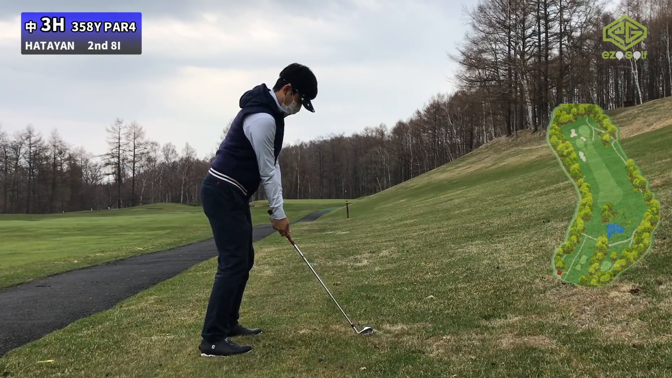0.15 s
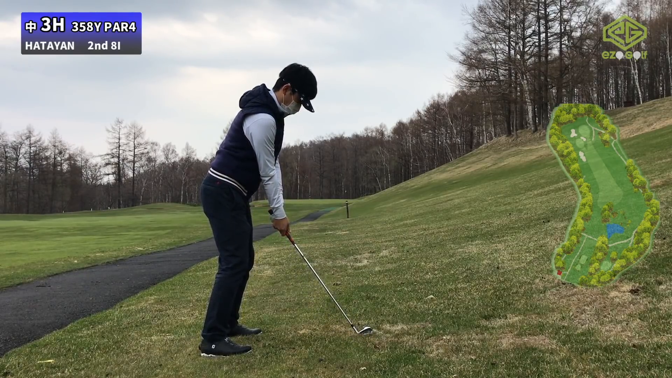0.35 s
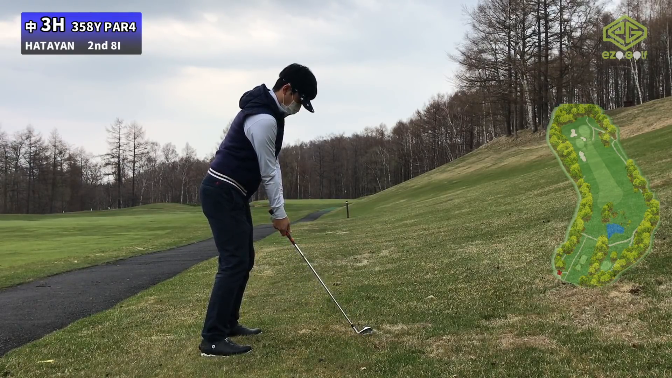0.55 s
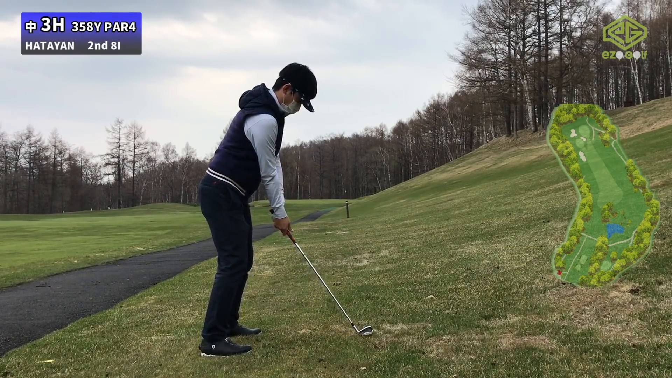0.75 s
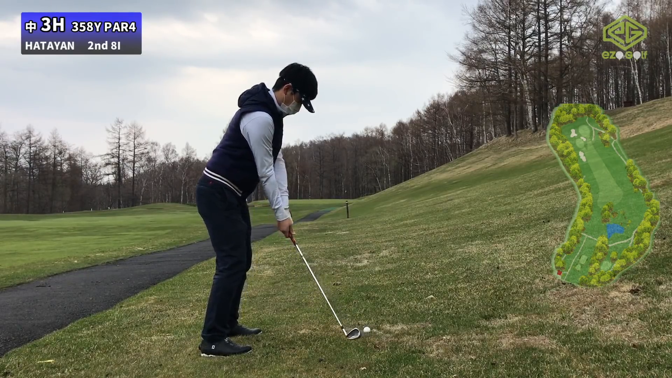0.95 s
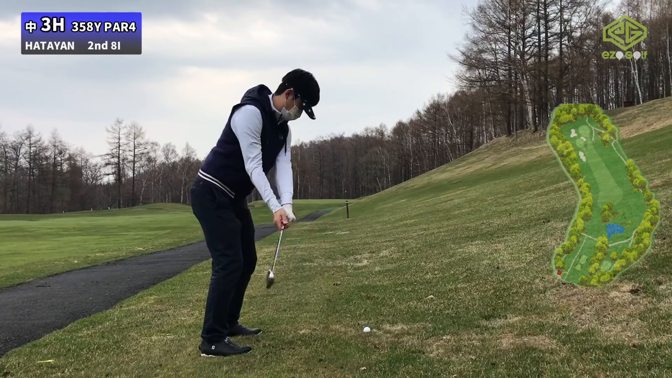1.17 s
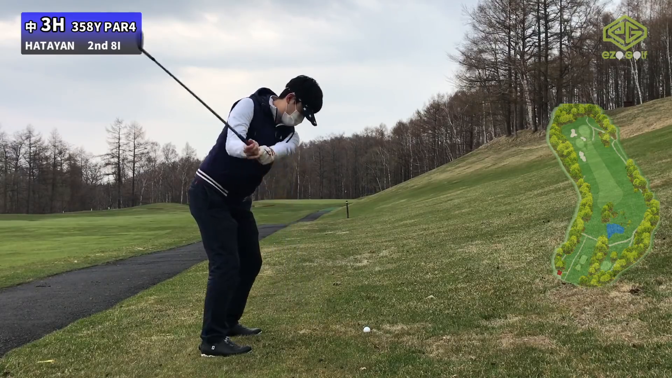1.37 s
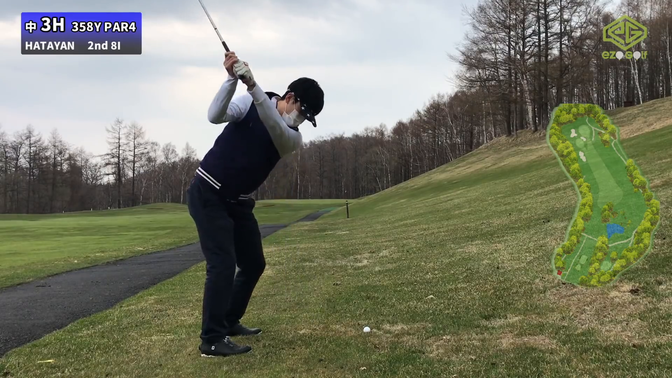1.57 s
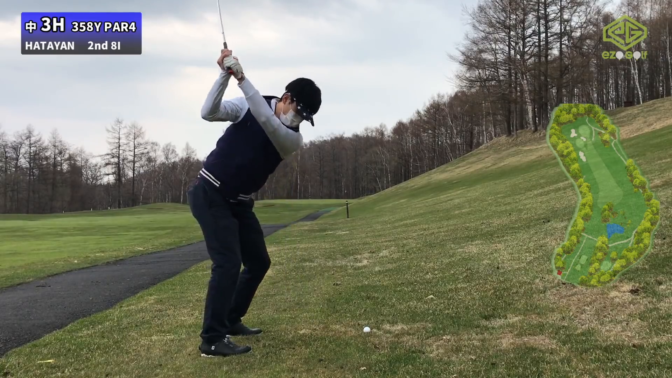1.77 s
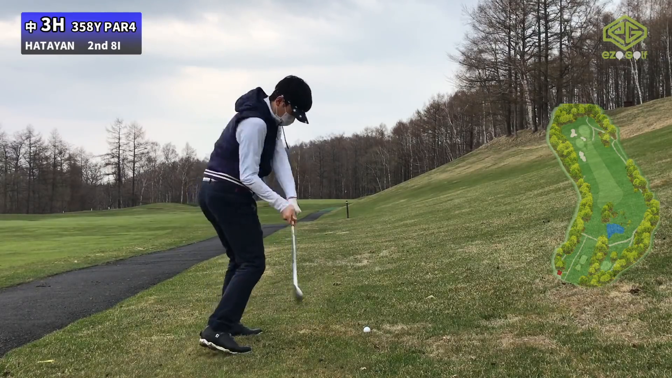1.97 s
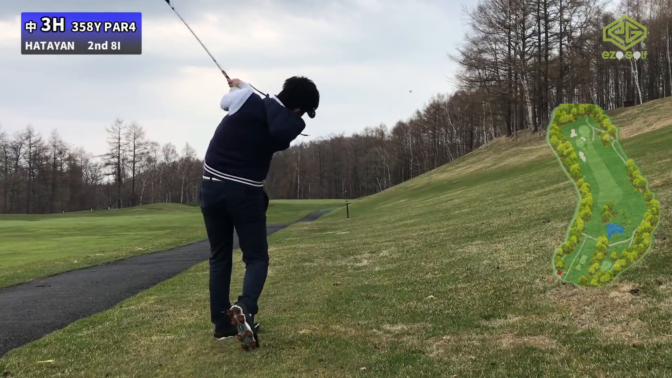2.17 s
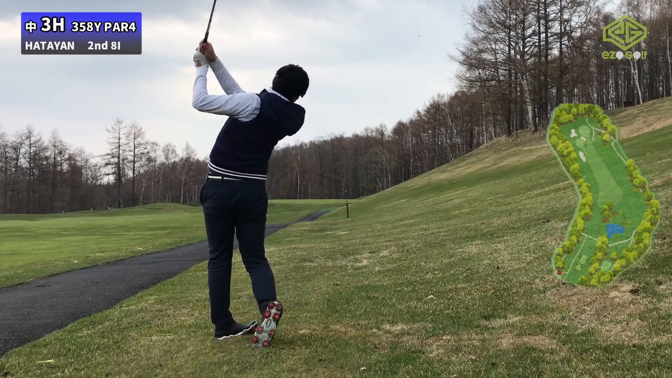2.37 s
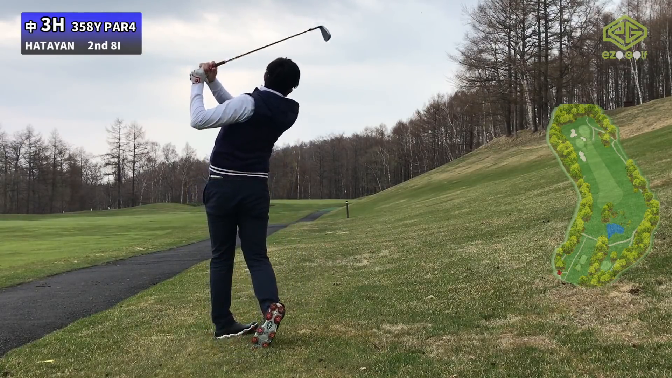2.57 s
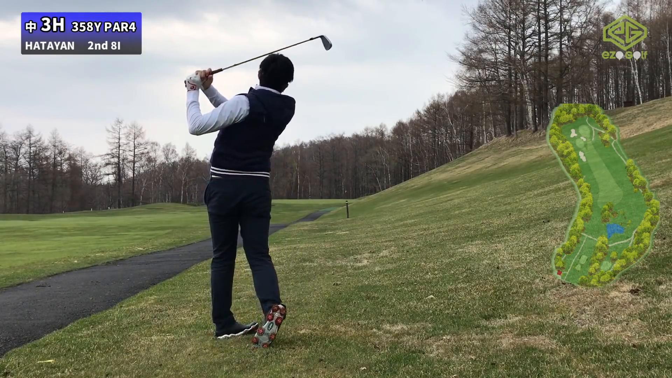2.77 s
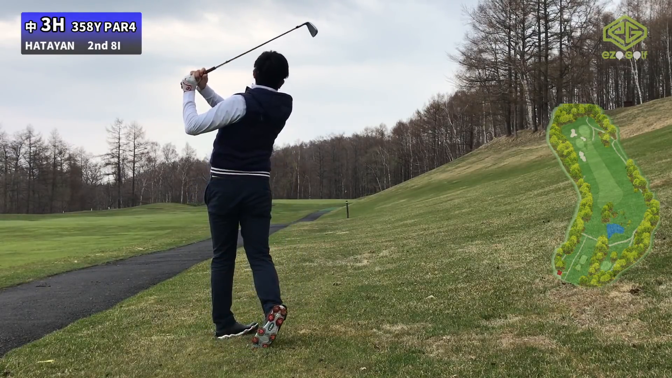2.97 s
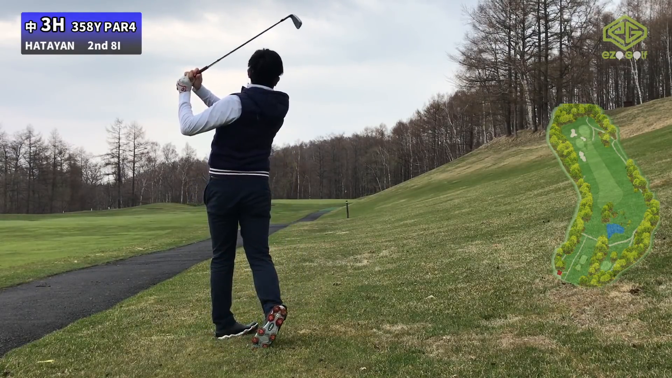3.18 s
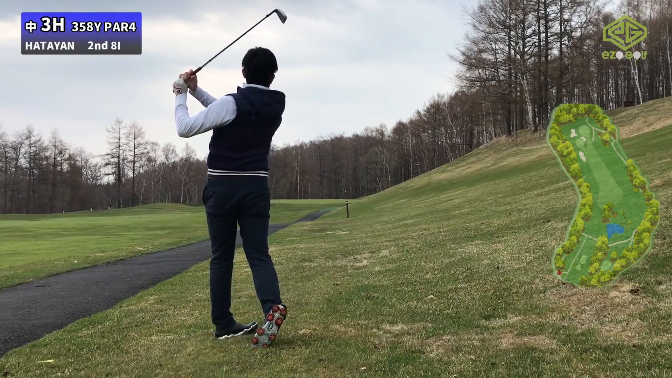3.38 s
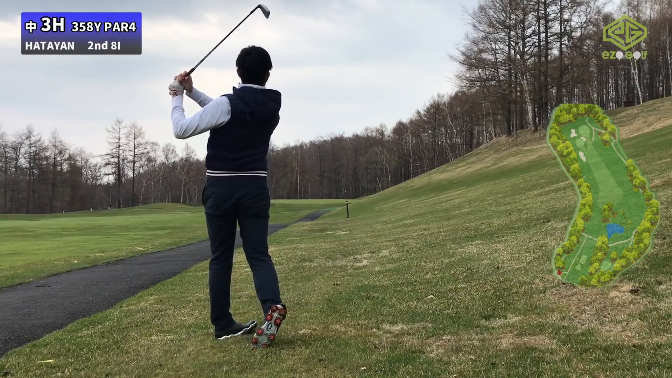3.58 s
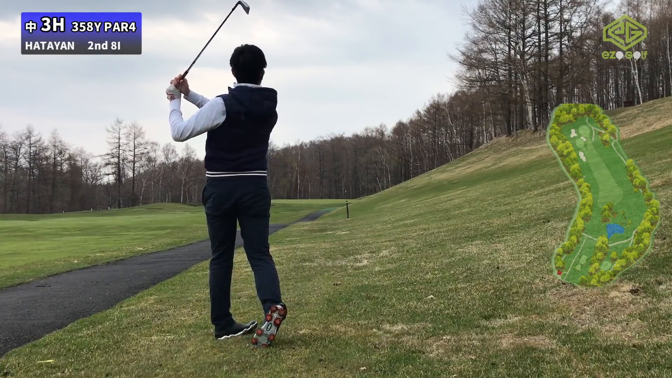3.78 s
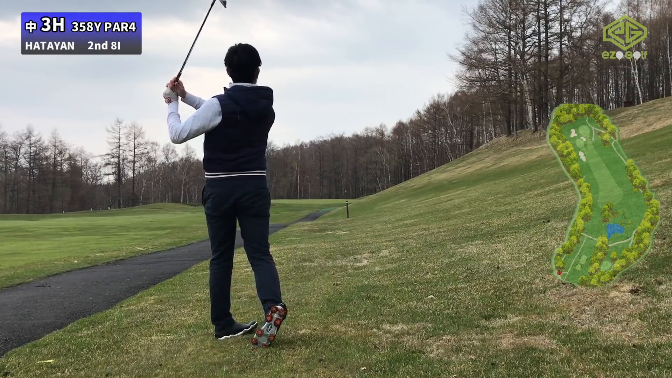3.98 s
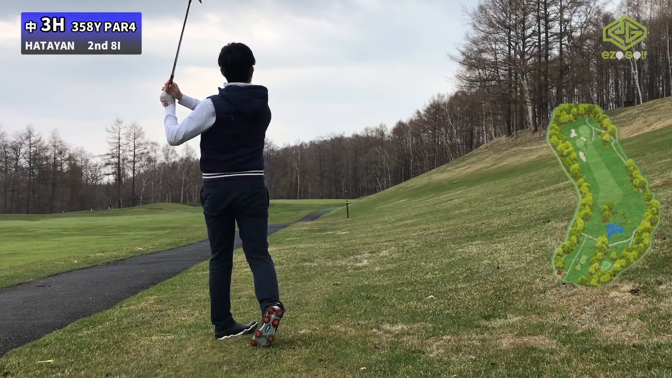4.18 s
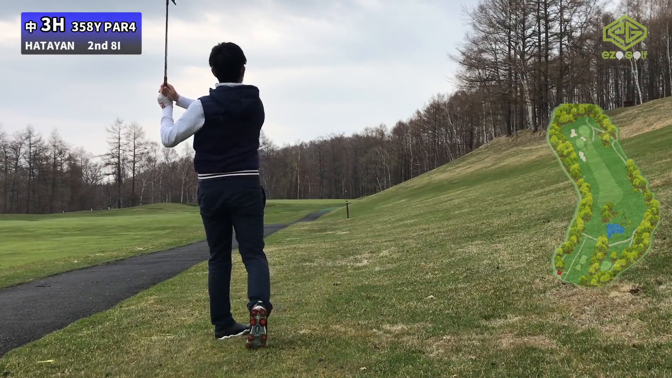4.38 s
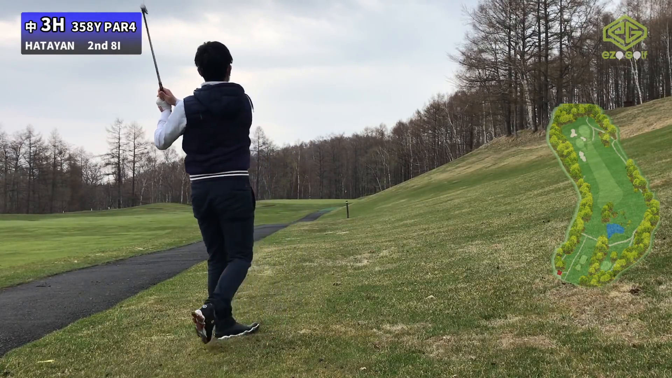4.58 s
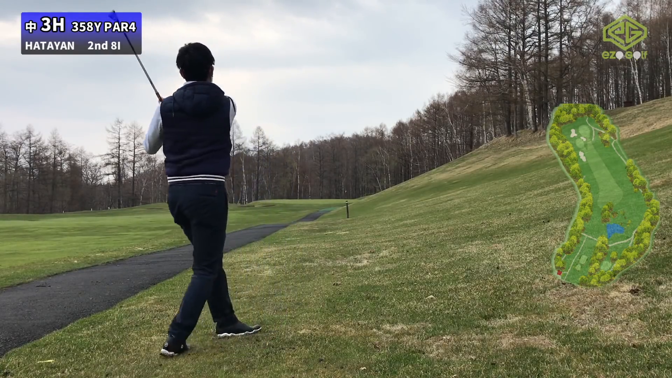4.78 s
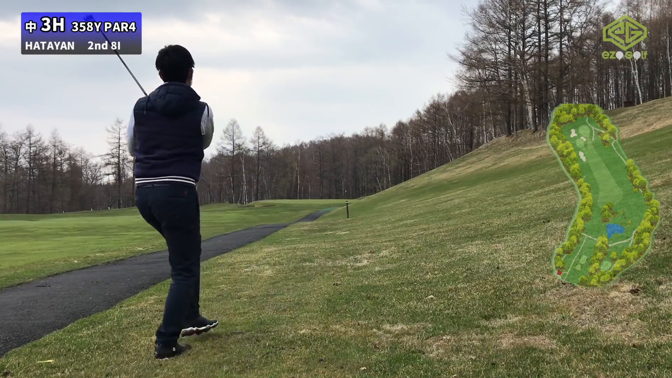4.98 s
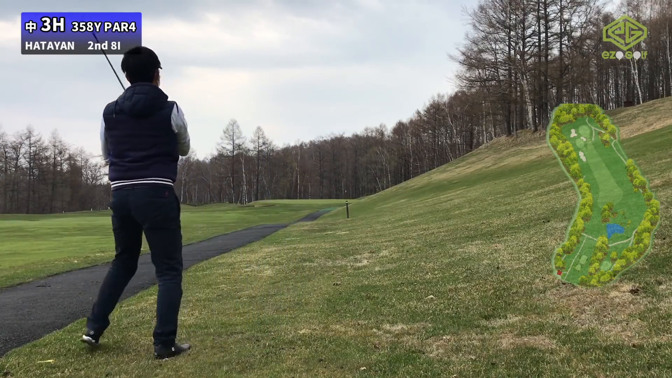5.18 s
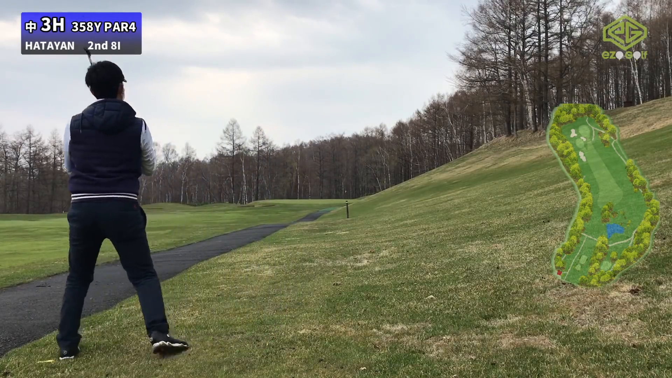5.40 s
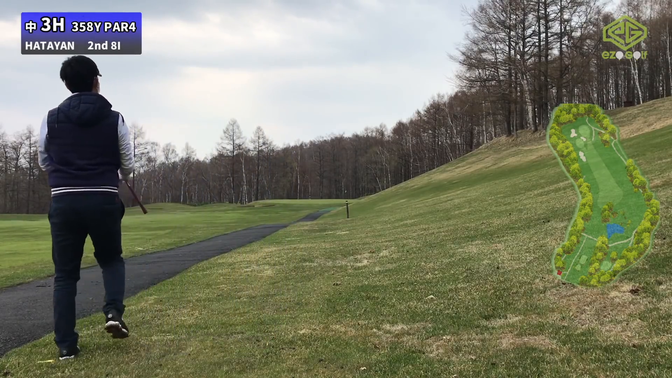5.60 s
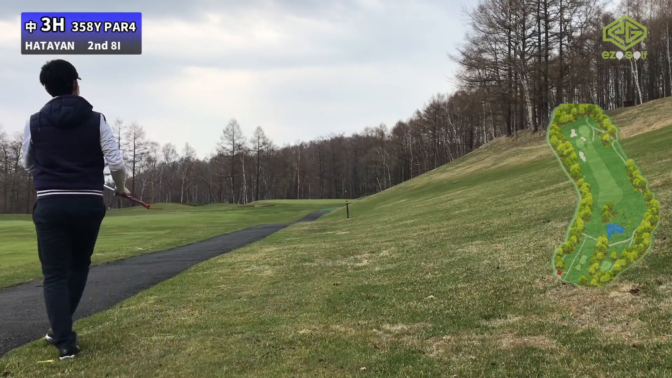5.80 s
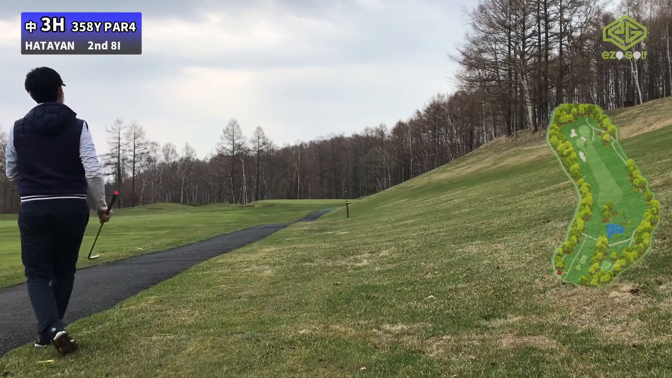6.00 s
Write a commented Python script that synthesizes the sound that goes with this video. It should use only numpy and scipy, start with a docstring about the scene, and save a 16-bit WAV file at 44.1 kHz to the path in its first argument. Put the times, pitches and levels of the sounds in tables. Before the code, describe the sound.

A golf iron swishes and hits the ball with one sharp crack, over the low hum of a distant idling engine.

```python
"""A golfer hits an iron off a fairway. From the start an engine hums and whines some way off, under a
light wash of outdoor air. Clothes creak and shoes brush the grass. About two seconds in, the club
swishes through the air, its steel face cracks on the ball and overloads the microphone, and torn turf
sprays away. Something snaps once in the follow-through. Then the golfer shuffles and the engine idles on."""
import sys
import numpy as np
from scipy import signal
from scipy.fft import rfft, irfft, next_fast_len
from scipy.io import wavfile

SR = 44100
rng = np.random.default_rng(int(sys.argv[2]) if len(sys.argv) > 2 else 0)


def waveform_to_disk(signal):
    """Save audio, clipped to [-1, 1], as 16-bit WAV at the path in sys.argv[1]."""
    frames = np.transpose(np.atleast_2d(signal))
    scaled = np.clip(frames, -1, 1) * 32767
    samples = np.round(scaled).astype(np.int16)
    wavfile.write(sys.argv[1], SR, samples)


N = 266716
STRIKE_S = 2.1524  # the moment the club meets the ball


def strike(ball_lag_s=.00093):
    """The hit makes the steel face ring; the ball knocks and the ground thumps just after."""
    # Ringing tones of the club face: f/Hz, level/dB, time to fade by 60 dB/s
    face_modes = [(2380, 8, .0074), (2800, -6, .015), (2970, -7, .0146), (3370, 10, .0059),
                  (3820, -8, .019), (4050, -7, .0138), (4760, -11, .0115), (5880, 9, .0089),
                  (6580, 17, .0054), (7130, 12, .0062), (8570, -8, .013), (12050, -9, .016),
                  (13800, -3, .009)]
    # Tones of the ball's knock: f/Hz, level/dB, time to fade by 60 dB/s
    ball_modes = [(860, -5, .0146), (1120, 7.5, .012), (1610, 13, .0075), (2020, 12, .0052),
                  (1640, -28, .08)]
    # Low tones of the turf's thump: f/Hz, level/dB, time to fade by 60 dB/s
    ground_modes = [(145, -22.5, .05), (85, -24.5, .07)]
    face = ring(clicks([(STRIKE_S, 0)]), face_modes)
    push = clicks([(STRIKE_S + ball_lag_s, 0)])
    bass_cut = signal.butter(4, 700, "high", fs=SR, output="sos")  # so small a ball gives off no bass
    ball = signal.sosfilt(bass_cut, ring(push, ball_modes))
    return face + ball + ring(push, ground_modes)


def swish(downswing_s=.115, t60_s=.13, top_db=-34, top_eddy_hz=600, hiss_db=-5, eddy_db=-6.5):
    """The club sheds swirls of air (eddies): their tone and hiss grow higher and louder with speed."""
    since_hit = np.arange(N) / SR - STRIKE_S
    # Like a pendulum, the club is fastest at the bottom, where the ball lies.
    speed = np.sin(np.pi / 2 * np.clip(1 + since_hit / downswing_s, 1e-3, 1))
    level_db = top_db + 10 * np.log2(speed)
    dying_db = -60 * np.clip(since_hit / t60_s, 0, 4)
    eddy_hz = top_eddy_hz * speed
    hiss, near = np.zeros(N), np.abs(since_hit) < .25
    for hz in np.geomspace(250, 11000, num=10):
        # The hiss falls off gently above the eddy tone and steeply below it.
        octaves = np.log2(hz / eddy_hz[near])
        slope_db = -2 * np.maximum(octaves, 0) + 12 * np.minimum(octaves, 0)
        hiss[near] += from_db(slope_db) * band_noise(hz, 1.25, rng.standard_normal(near.sum()))
    eddies = tone(eddy_hz * (1 + .12 * drift(90))) * from_db(2 * drift(60))
    return from_db(level_db + dying_db) * (from_db(hiss_db) * speed * hiss + from_db(eddy_db) * eddies)


def divot(lag_s=.004, crunch_db=-10.5, tear_db=-25.5, spray_db=-49.5):
    """The blade digs into the turf: a short crunch, tearing roots, then soil and grass raining down."""
    # Spectrum of tearing turf: f/Hz, relative level/dB
    turf_spectrum = [(300, 1.5), (700, 2.5), (1500, -6), (3000, -1.5), (5000, -5), (7000, -2.5),
                     (10000, -7.5), (13000, -3.5), (15500, -15.5)]
    peak_s = STRIKE_S + lag_s
    crunch = from_db(crunch_db) * envelope(peak_s, attack_s=.021, hold_s=0, t60_s=.0058)
    tear = from_db(tear_db) * envelope(peak_s, attack_s=.03, hold_s=0, t60_s=.0863)
    spray = from_db(spray_db) * envelope(peak_s, attack_s=.03, hold_s=.39, t60_s=.28)
    return (crunch + tear + spray) * colour(grains(per_s=8100, spread_db=2.5), turf_spectrum)


def snap(at_s=2.3753, snap_db=-11, crack_db=-22, lead_s=.0026, count=3):
    """Something gives way in the follow-through: a few small, uneven cracks, then one sharp one."""
    # Ringing tones of the thing that snaps: f/Hz, level/dB, time to fade by 60 dB/s
    snap_modes = [(517, -12.5, 0.022), (1320, -13.5, 0.0061), (2630, -7.5, 0.003), (3900, -4.5, 0.0034),
                  (5900, -1, 0.0012), (8500, 0, 0.00073), (12500, -5, .001)]
    leads = lead_s * (count - np.arange(count) - .5 * rng.random(count)) / count
    small_cracks = [(at_s - lead, crack_db) for lead in leads]
    return ring(clicks(small_cracks + [(at_s, snap_db)]), snap_modes)


def rustle(tick_t60_s=.0047, crumble_db=-15):
    """As the golfer moves, cloth and grass rub softly and give small, dry ticks."""
    # Movements that brush clothes and shoes: t/s, time held/s, level/dB
    brushes = [(1.24, 0.13, -65), (1.434, 0.43, -62.5), (1.83, 0.27, -59.5), (2.494, 0.062, -52),
               (2.674, 0.076, -60.5), (4.832, 0.2, -60.5), (5.36, .17, -61), (5.588, .02, -58),
               (5.95, .1, -65)]
    # Spectrum of the brushing: f/Hz, relative level/dB
    grass_spectrum = [(1500, -11), (3500, 5), (6000, -0.5), (9000, -5), (13000, -4), (15800, -5.5)]
    # Ticks of clothes, grip and dry grass: t/s, peak level/dB, f/Hz
    ticks = [(.657, -38, 13000), (.8505, -39, 3280), (1.355, -37, 12000), (1.4505, -38, 3400),
             (1.7463, -27.5, 3780), (1.7645, -31.5, 3760), (1.791, -35, 4200), (1.83, -35.5, 3800),
             (1.841, -38, 3600), (1.914, -40, 4800), (1.979, -36, 5200), (2.056, -34, 4600),
             (2.427, -36, 6500), (2.515, -32, 2470), (2.638, -37, 2400), (2.665, -37, 13000),
             (3.6696, -37, 13050), (4.675, -36, 13000), (5.4152, -30, 12000), (5.5862, -33, 12010),
             (5.678, -37.5, 12500)]
    swells = [from_db(db) * envelope(s, attack_s=.23, hold_s=held, t60_s=.24) for s, held, db in brushes]
    out = np.max(swells, axis=0) * colour(grains(per_s=2900, spread_db=2.5), grass_spectrum)
    fade = from_db(-60 * np.arange(2048) / SR / tick_t60_s)
    for s, db, hz in ticks:
        release = from_db(crumble_db) * fade * rng.standard_normal(len(fade))
        release[0] = 1  # one sharp click ahead of the crumbling
        tick = band_noise(hz, 1.55, release)
        at = round(s * SR)
        out[at:at + len(tick)] += from_db(db) * tick / np.abs(tick).max()
    return out


def scuffs(band_ratio=1.26):
    """Soles scrape the turf: each scuff is a short swell of crackle around its own pitch."""
    # Scuffs of the shoes: t/s, level/dB, f/Hz, width of the swell/s
    scrapes = [(1.46, -57, 600, 0.01), (2.45, -50.5, 343, 0.022), (3.563, -56, 3400, 0.011),
               (4.718, -54, 2202, 0.013), (4.759, -51, 2380, 0.0052), (4.854, -63, 5500, 0.015),
               (5.125, -50.5, 3720, 0.011), (5.385, -58.5, 12500, 0.03), (5.413, -59, 6500, 0.023),
               (5.602, -58, 12000, .025), (5.62, -66, 4510, 0.019)]
    t = np.arange(N) / SR
    crackle = grains(per_s=7400, spread_db=8)
    out = np.zeros(N)
    for s, db, hz, width in scrapes:
        swell = np.exp(-.5 * ((t - s) / width) ** 2)
        out += from_db(db) * swell * band_noise(hz, band_ratio, crackle)
    return out


def engine(lower_db=-41.5, upper_db=-44, rumble_db=-38.5, whine_multiple=50):
    """An idling engine: hum, throb and whine follow its turning rate, over the rumble of the exhaust."""
    # Idling speed: t/s, turning rate/Hz
    idle = [(0, 29.8), (.6, 29.76), (1.3, 29.58), (1.8, 29.7), (2.38, 29.54), (2.8, 29.8), (3.6, 29.88),
            (4.9, 29.82), (5.5, 29.96), (6.05, 29.9)]
    # Tones of the hum: multiple of the turning rate, level/dB
    harmonics = [(1, -62), (3, -38.5), (4, -56), (5, -51), (6, -50.5), (7, -64), (8, -64), (9, -66.5),
                 (10, -66.5)]
    # Swell of the hum's sixth multiple: t/s, added level/dB
    sixth_swell = [(0, -5.5), (2.5, -3.5), (5.6, 5), (6.05, 6.5)]
    # Speed of the throb: t/s, beat rate/Hz
    beat_rates = [(0, .87), (2.1, .92), (2.3, 1.48), (6.05, 1.6)]
    # Spectrum of the exhaust: f/Hz, relative level/dB
    rumble_spectrum = [(20, -21.5), (32, -30), (45, -7.5), (70, -9), (100, 4.5), (120, 2), (150, -10),
                       (200, -13.5), (280, -22), (450, -34)]
    # The thin whine coming and going: t/s, level/dB
    whine_levels = [(0, -70), (.1, -52), (.21, -66), (.4, -53.5), (.6, -54), (.75, -65), (.87, -57),
                    (1.07, -64), (1.8, -59), (2.25, -67), (2.65, -57), (3.34, -67.5), (3.77, -52.5),
                    (3.98, -63), (4.36, -56.5), (4.62, -57), (4.7, -74), (4.8, -58), (5.1, -69.5),
                    (5.28, -58), (5.6, -52.5), (5.69, -66), (5.77, -55.5), (6.05, -56)]
    turn_hz = in_time(idle)
    hum = np.zeros(N)
    for multiple, db in harmonics:
        swell_db = in_time(sixth_swell) if multiple == 6 else 0
        hum += from_db(db + drift(2) + swell_db) * tone(multiple * turn_hz)
    # Two close tones near twice the turning rate weaken and boost each other in turn: a throb.
    centre = 2 * np.pi * (np.cumsum(2 * turn_hz) / SR + rng.random())
    apart = np.pi * np.cumsum(in_time(beat_rates)) / SR
    lower = from_db(lower_db) * np.sin(centre - apart)
    upper = from_db(upper_db) * np.sin(centre + apart)
    throb = np.sqrt(2) * (lower - upper)
    rumble = from_db(rumble_db) * colour(rng.standard_normal(N), rumble_spectrum)
    whine_db = in_time(whine_levels) + 2.35 * drift(10)
    whine_hz = whine_multiple * turn_hz * (1 + .0012 * drift(23.5))
    return hum + throb + rumble + from_db(whine_db) * tone(whine_hz)


def outdoor_air(level_db=-51.5):
    """A light, steady wash of noise from the open air."""
    # Spectrum of the air: f/Hz, relative level/dB
    air_spectrum = [(190, -30.5), (330, -8.5), (495, -12), (560, -8.5), (780, -8.5), (1200, -6.5),
                    (1350, -8), (1510, -5), (1700, -11), (3100, -15), (4550, -19.5), (4900, -26.5),
                    (6200, -24.5), (7700, -30), (8900, -29.5), (9550, -24.5), (10350, -33.5), (11200, -28),
                    (13000, -28.5), (15700, -31.5)]
    return from_db(level_db) * colour(rng.standard_normal(N), air_spectrum)


def from_db(db):
    """Turn decibels into a number to multiply by."""
    return 10 ** (np.asarray(db) / 20)


def rms_one(x):
    """Scale x so that its average strength (rms) is 1."""
    return x / np.sqrt(np.mean(x ** 2) + 1e-20)


def in_time(points):
    """Join (time, value) points with straight lines, giving a value for every sample."""
    times, values = np.transpose(points)
    return np.interp(np.arange(N) / SR, times, values)


def drift(rate_hz):
    """A smooth random wobble of about size 1; a higher rate wobbles faster."""
    step = 40  # samples between random values
    r = np.exp(-2 * np.pi * step * rate_hz / SR)
    slow = signal.lfilter([1], [1, -2 * r, r * r], rng.standard_normal(N // step + 2002))[2000:]
    return np.interp(np.arange(N) / step, np.arange(len(slow)), rms_one(slow))


def envelope(peak_s, attack_s, hold_s, t60_s):
    """Rise by 60 dB over attack_s to reach 1 at peak_s, hold, then fade by 60 dB every t60_s."""
    t = np.arange(N) / SR - peak_s
    before = np.maximum(-t / attack_s, 0)
    after = np.maximum((t - hold_s) / t60_s, 0)
    return from_db(-60 * np.minimum(before + after, 4))


def colour(x, spectrum):
    """Shape the lows and highs of x with a spectrum, falling steeply past its ends; rms 1."""
    hz, db = np.transpose(spectrum)
    size = next_fast_len(N)
    f = np.maximum(np.arange(size // 2 + 1) * SR / size, 1)
    roll_off = np.minimum(f / hz[0], 1) ** 4 * np.minimum(hz[-1] / f, 1) ** 4
    gain = from_db(np.interp(np.log(f), np.log(hz), db))
    return rms_one(irfft(rfft(x, size) * roll_off * gain, size)[:N])


def band_noise(hz, ratio, source):
    """Keep the part of a source from hz / ratio to hz * ratio; rms 1."""
    edges = [hz / ratio, min(hz * ratio, .45 * SR)]
    return rms_one(signal.sosfilt(signal.butter(2, edges, "band", fs=SR, output="sos"), source))


def grains(per_s, spread_db):
    """Tiny touches of uneven size at random moments."""
    touches = (rng.random(N) < per_s / SR) * rng.standard_normal(N)
    return touches * from_db(spread_db * np.clip(rng.standard_normal(N), -2, 2))


def clicks(rows):
    """A one-sample push for each row of t/s, level/dB."""
    out = np.zeros(N)
    for s, db in rows:
        out[round(s * SR)] += from_db(db)
    return out


def ring(force, modes):
    """A struck object rings with fading tones (modes); neighbours swing in opposite directions."""
    out = np.zeros(N)
    for k, (hz, db, t60) in enumerate(modes):
        decay, angle = from_db(-60 / (t60 * SR)), 2 * np.pi * hz / SR
        feedback = [1, -2 * decay * np.cos(angle), decay * decay]
        out += (-1) ** k * from_db(db) * signal.lfilter([0, np.sin(angle)], feedback, force + 1e-18)
    return out


def tone(hz):
    """A pure tone of rms 1 that follows a changing pitch."""
    return np.sqrt(2) * np.sin(2 * np.pi * (np.cumsum(hz) / SR + rng.random()))


def scene():
    """All the sounds in the open air, added into one channel."""
    return (outdoor_air() + engine() + swish() + strike() + divot() + rustle() + snap() + scuffs())[None]


def record(dry):
    """The crack overloads the microphone, which flattens its peaks; the highest treble is cut."""
    clipped = dry / (1 + dry ** 6) ** (1 / 6)
    treble_cut = signal.ellip(10, .1, 70, 15850, fs=SR, output="sos")
    return signal.sosfilt(treble_cut, clipped)


dry = scene()
out = record(dry)
waveform_to_disk(out)
```